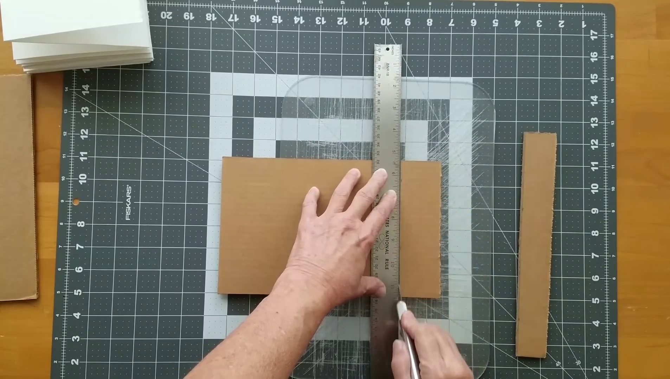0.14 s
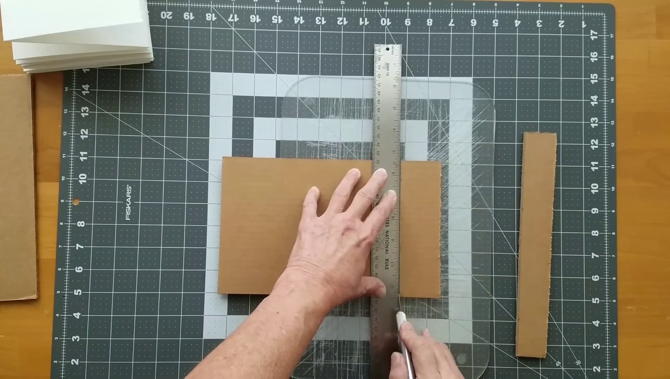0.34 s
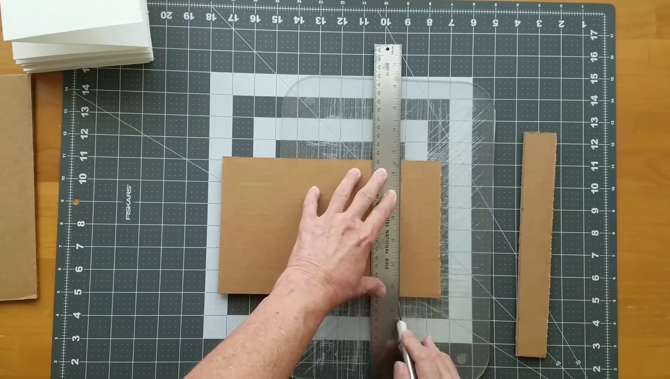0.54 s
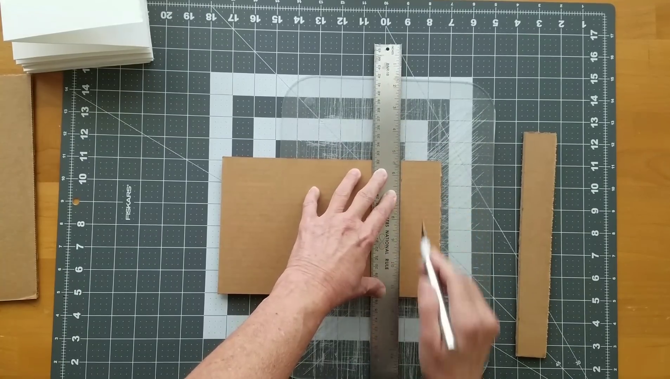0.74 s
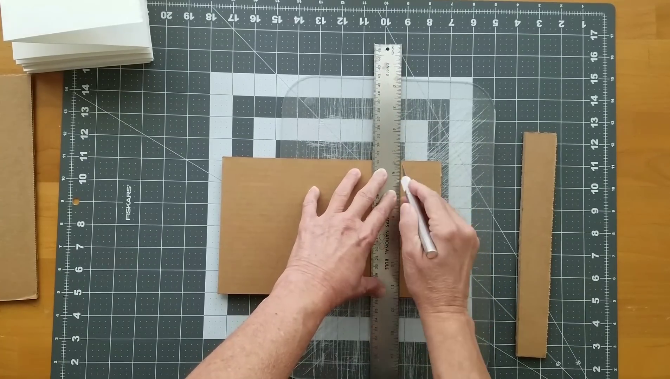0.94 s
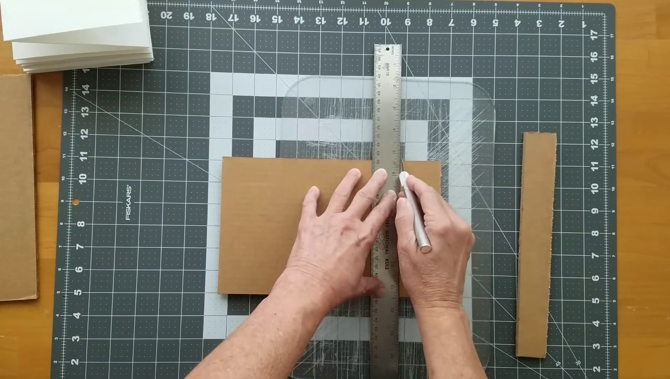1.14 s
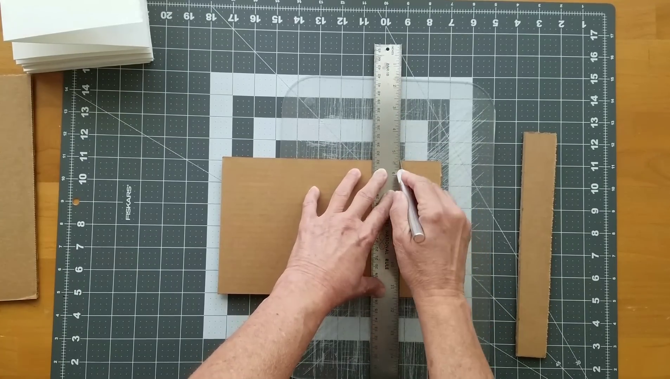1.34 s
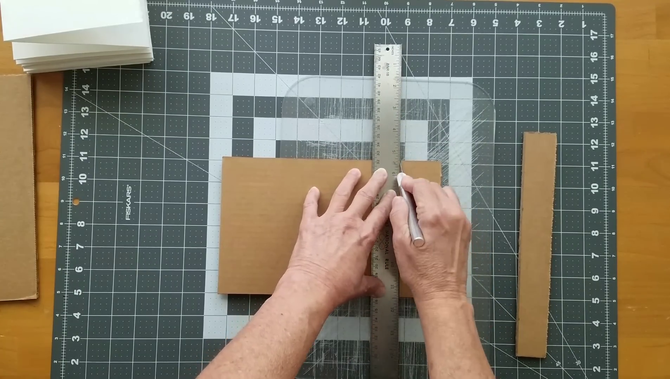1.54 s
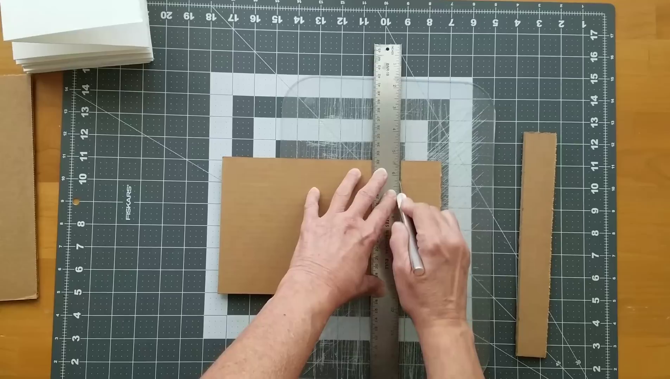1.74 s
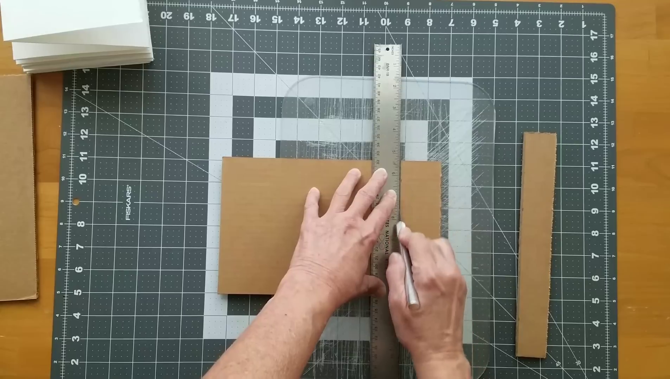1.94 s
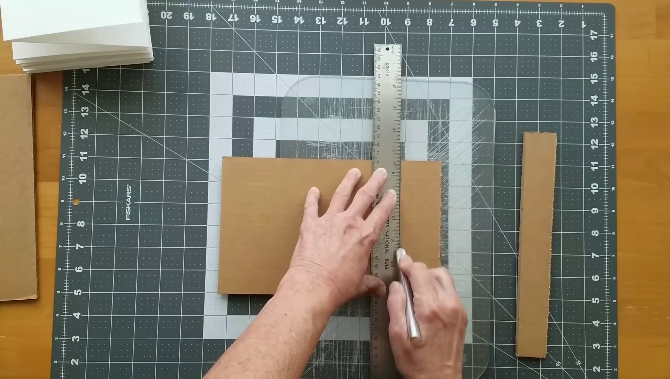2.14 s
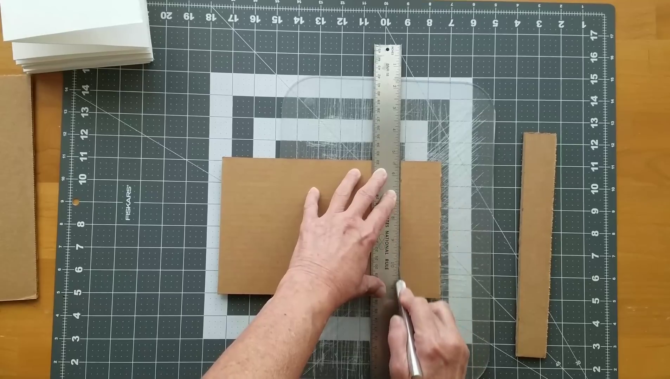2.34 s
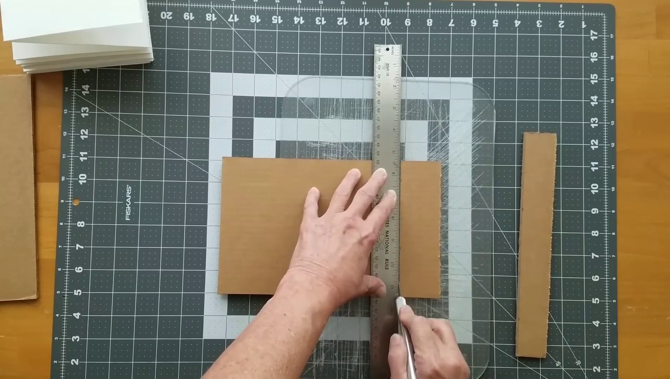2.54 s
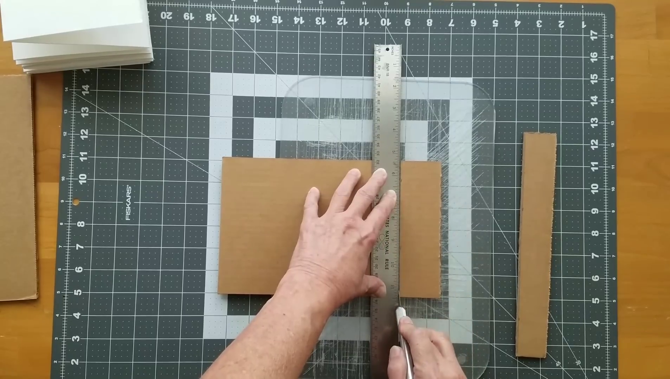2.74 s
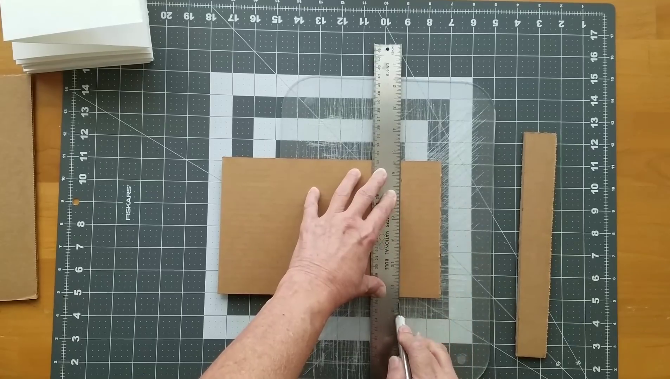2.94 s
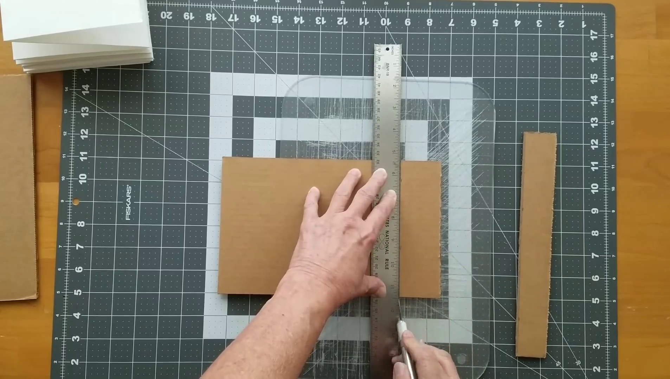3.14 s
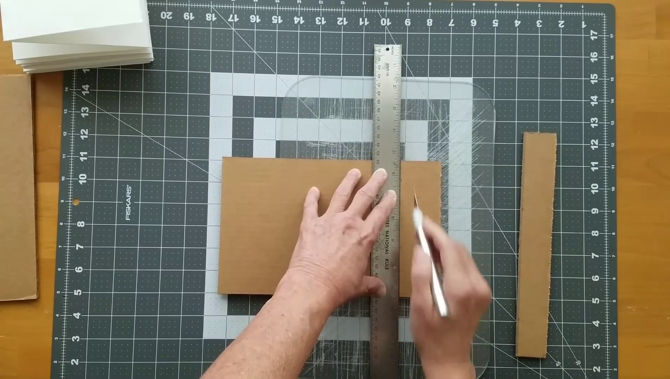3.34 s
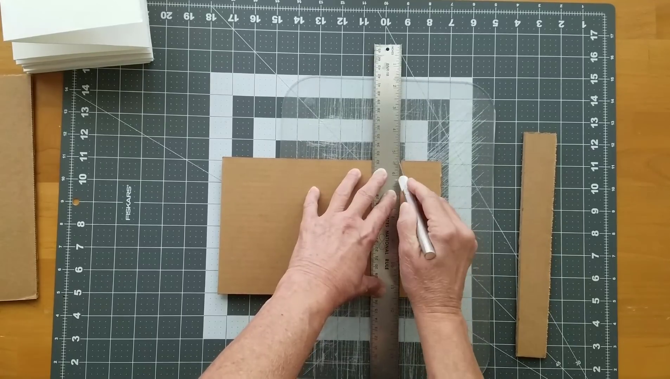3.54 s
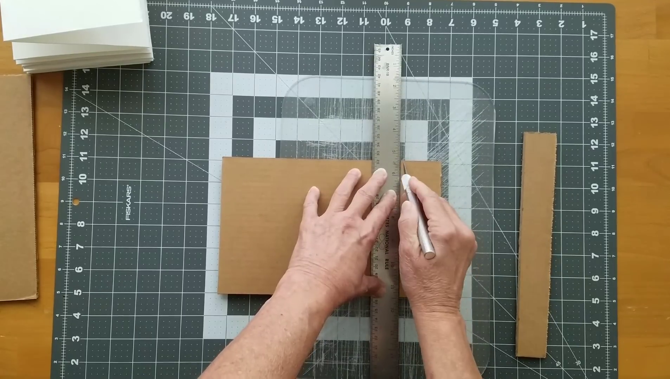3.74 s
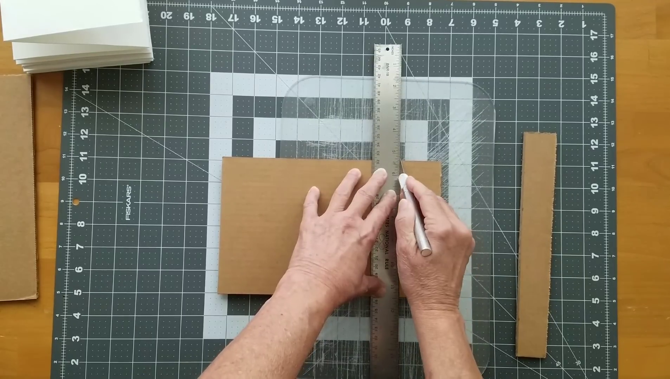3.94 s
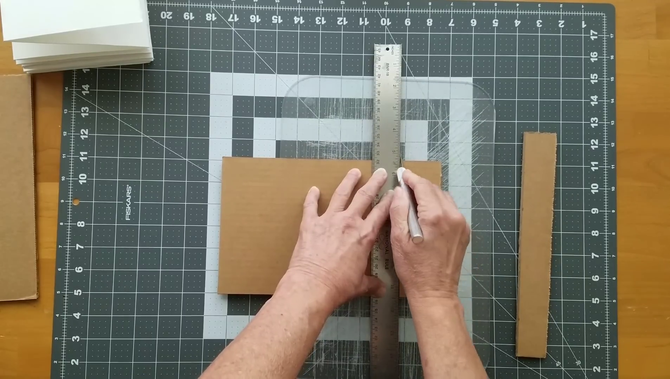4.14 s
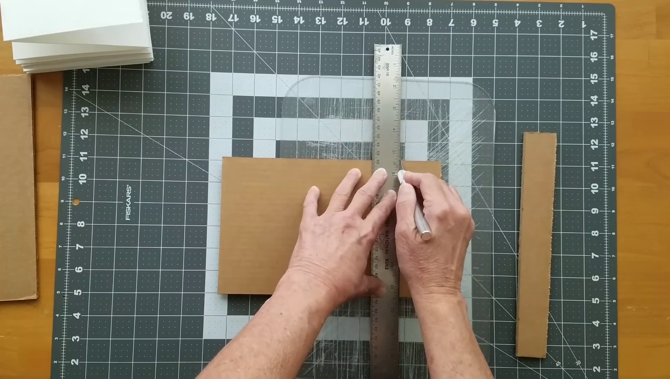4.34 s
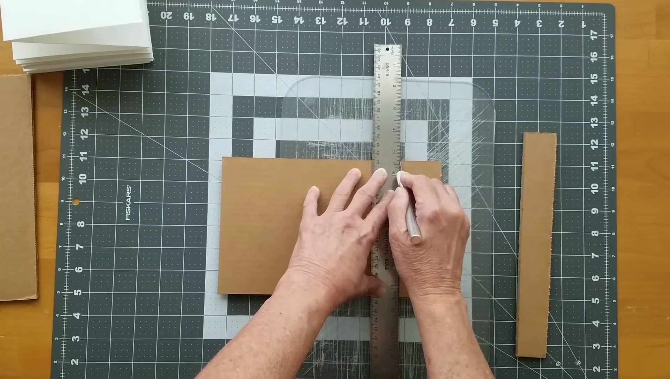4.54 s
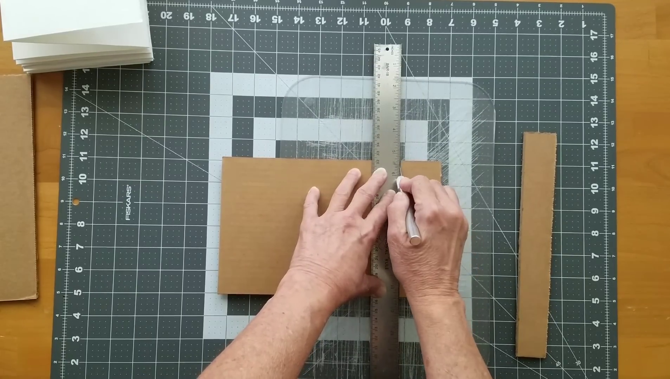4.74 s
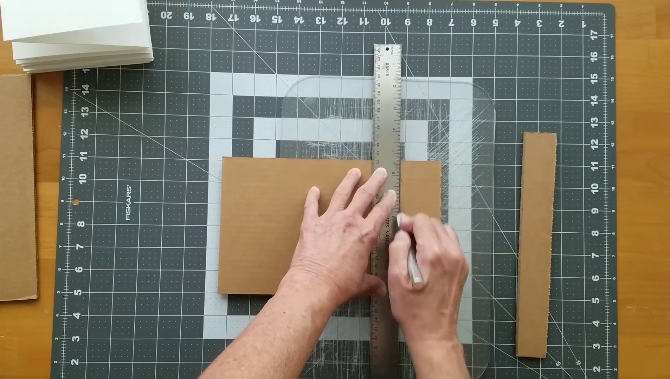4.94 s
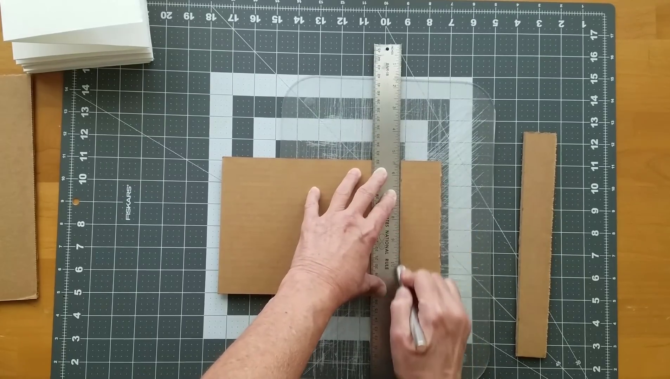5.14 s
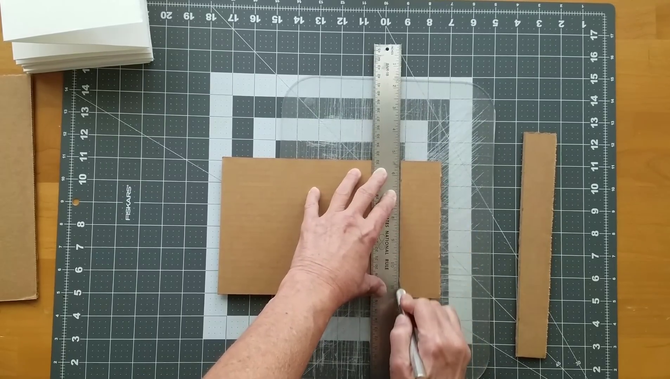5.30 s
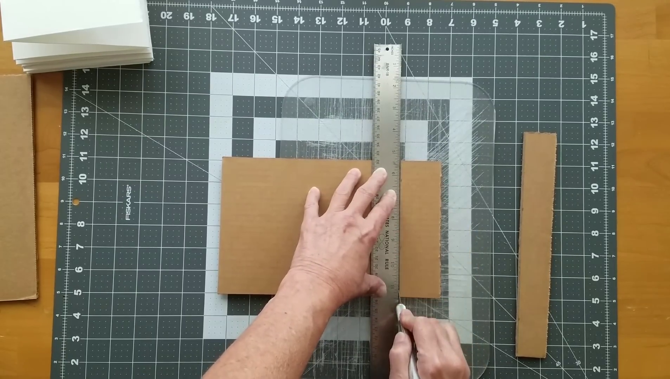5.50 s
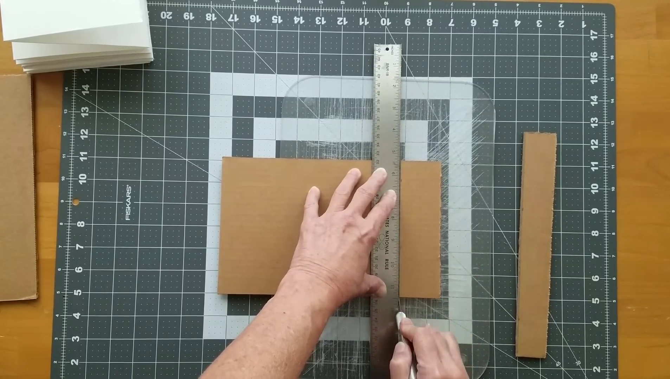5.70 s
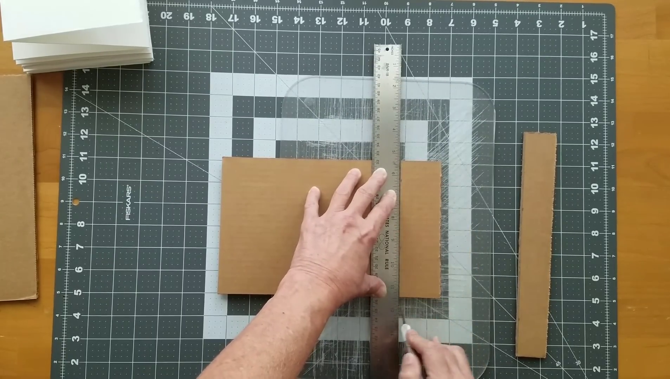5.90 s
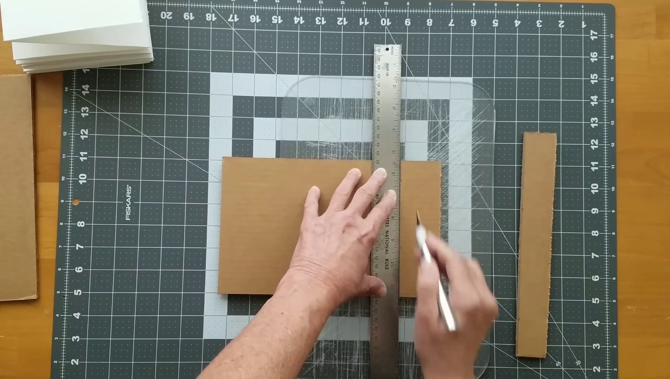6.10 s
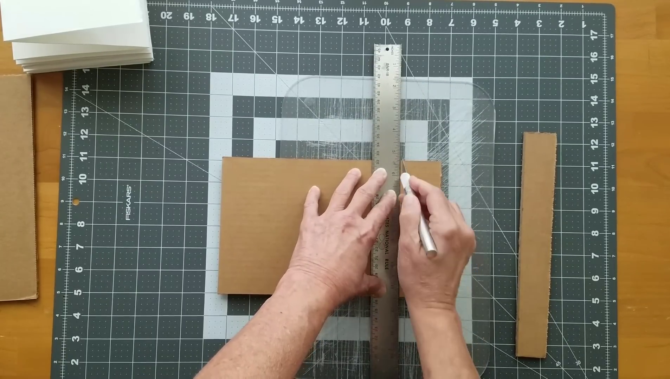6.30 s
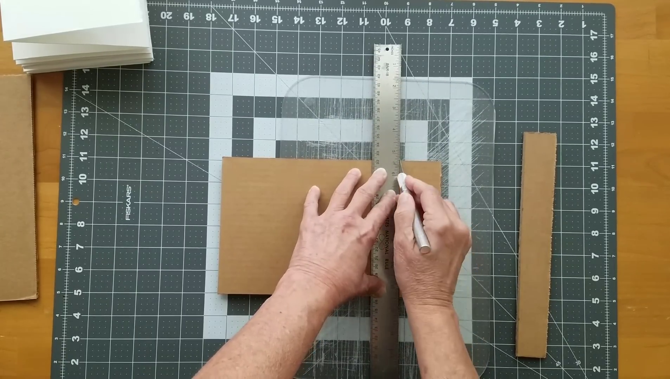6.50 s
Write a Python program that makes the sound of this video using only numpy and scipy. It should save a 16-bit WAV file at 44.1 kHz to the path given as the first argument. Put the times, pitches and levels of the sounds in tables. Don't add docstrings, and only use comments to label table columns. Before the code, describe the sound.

Close above a table in a small dry room, a craft knife finishes a cardboard cut and drops with a loud knock. After a quiet gap come two joined crunchy pulls, a duller double knock, small taps and ticks of steel on the ruler, then one last rasping cut and faint handling. Low ventilation rumble and slight microphone hiss stay underneath.

```python
import sys
import numpy as np
from scipy import signal
from scipy.fft import rfft, irfft, next_fast_len
from scipy.io import wavfile
from scipy.ndimage import uniform_filter1d

SR = 44100
rng = np.random.default_rng(int(sys.argv[2]) if len(sys.argv) > 2 else 0)


def dump(signal):
    limited = np.clip(np.atleast_2d(signal).T, -1, 1)
    pcm = np.round(limited * 32767).astype(np.int16)
    wavfile.write(sys.argv[1], SR, pcm)


def amplitude_ratio(level_db):
    exponent = np.asarray(level_db, float) / 20
    return 10 ** exponent


N = 293706

# hz, level_db (per Hz)
TEARING_COLOUR = [(90, -41.5), (150, -8.5), (280, -5), (800, -5), (1440, -19.5), (2300, -14), (3700, -22),
                  (6600, -30.5), (8100, -36), (11800, -24.5), (13200, -25.5), (15000, -25.5), (17000, -29)]
# start_s, thud_peak_db, rattle_db (board, above the thud), rattle_hz, thud_hz
BLADE_DROPS = [
    (0.491, -10, -8.5, 2300, 387),
    (3.0, -14, -27, 2940, 504),
    (3.169, -24, -9, 2950, 456),
]


def curve(table, hz):
    f, value = np.transpose(table)
    return np.interp(np.log(hz + 1), np.log(f), value)


def shape(x, gain):
    size = next_fast_len(x.shape[-1])
    hz = np.arange(size // 2 + 1) * SR / size
    return irfft(rfft(x, size) * gain(hz), size)[..., :x.shape[-1]]


def unit(x):
    return x / np.sqrt(np.mean(x ** 2))


def above(hz, edge_hz):
    return 1 / np.sqrt(1 + (edge_hz / (hz + 1)) ** 8)


def walk(rate_hz):
    hold = int(SR / rate_hz)
    steps = np.repeat(rng.standard_normal(N // hold + 1), hold)
    smooth = uniform_filter1d(uniform_filter1d(steps, hold), hold)
    return unit(smooth[:N])


def add(out, start_s, x):
    i = int(start_s * SR)
    out[..., i:i + x.shape[-1]] += x[..., :N - i]


def pair(x):
    # hz, likeness (0-1)
    likeness = [(60, 1), (200, 0.9), (380, 0.86), (700, 0.4), (1300, 0.1), (2400, 0.31), (4400, 0),
                (8000, 0), (12000, 0.5)]
    mid = shape(x[0], lambda f: np.sqrt((1 + np.clip(curve(likeness, f), 0, 1)) / 2))
    side = shape(x[1], lambda f: np.sqrt((1 - np.clip(curve(likeness, f), 0, 1)) / 2))
    return np.array([mid + side, mid - side])


def ring(modes, shorten):
    t = np.arange(SR // 2) / SR
    y = np.zeros(len(t))
    for hz, db, t60_s in modes:
        y += amplitude_ratio(db) * np.sin(2 * np.pi * hz * t) * amplitude_ratio(-60 * t / (t60_s * shorten))
    no_bass = signal.butter(4, 255, "high", fs=SR, output="sos")
    y = signal.sosfilt(no_bass, y)
    return y / np.abs(y).max()


def burst(t60_s, low_hz, high_hz):
    rise_s = 0.00076
    t = np.arange(SR // 8) / SR
    noise = shape(rng.standard_normal((2, len(t))),
                  lambda f: above(f, low_hz) * (1 - above(f, high_hz)) * amplitude_ratio(curve(TEARING_COLOUR, f)))
    return unit(pair(noise)) * amplitude_ratio(-60 * t / t60_s) * np.minimum(t / rise_s, 1) / 2


def knife():
    hiss_level, scrape_level, drone_level, groan_level = push()
    # start_s, peak_db, scrape_db (above the peak)
    flutes = [(0.054, -38, -15), (0.088, -30.5, -3.5), (0.204, -37, -34), (0.245, -37, -1.5),
              (1.748, -46, -8), (1.766, -40, -12), (1.871, -36.5, -10), (1.928, -44, -22),
              (1.981, -32, -15), (2.017, -37, -12), (2.098, -44, -3), (2.1593, -31, -2.5),
              (2.181, -34, -16), (2.207, -41.5, -6), (2.26, -27.5, -12), (2.305, -29, -8.5),
              (2.322, -26.5, -8.5), (2.396, -32, -7.5), (2.442, -35, -5), (2.4735, -33.5, -3.5),
              (2.51, -31.5, -7.5), (2.7145, -42.5, -0.5), (4.8642, -40, -26), (4.8934, -50, -22),
              (4.923, -58, -15), (5.045, -43, 2), (5.15, -47, 9), (5.2, -42, 6), (5.258, -58, 6),
              (5.3954, -52.5, 7)]
    # pitch_hz, width_hz, level_db
    board = [(144, 24.5, 9), (281, 40, 0.5), (872, 41, 1.5), (1195, 21, -2.5), (1920, 16, -2),
             (2300, 230, -18.5), (2740, 50, -6.5)]

    attack_s, release_s = 0.0032, 0.0079
    bite = np.zeros((2, N))
    t = np.arange(SR // 5) / SR
    swell = (1 - np.exp(-t / attack_s)) * np.exp(-t / release_s)
    for start_s, db, scrape_db in flutes:
        add(bite, start_s, amplitude_ratio(db + np.array([[0], [scrape_db]])) * swell)
    hiss_bite, scrape_bite = bite

    grains = rng.standard_normal((2, N)) * (rng.random(N) < .3)
    fibres = unit(grains * amplitude_ratio(0.76 * rng.exponential(size=N)))
    fibres = fibres * amplitude_ratio(1.9 * walk(45) + 1.65 * walk(300))
    snaps = rng.standard_normal((2, N)) * (rng.random(N) < .006)
    snaps = snaps * amplitude_ratio(0.93 * rng.exponential(size=N))
    scraped = unit(fibres) + amplitude_ratio(-2) * unit(snaps) * amplitude_ratio(3.1 * walk(90))

    def board_tear(f):
        tones = sum(amplitude_ratio(db + 14) / np.sqrt(1 + (2 * (f - hz) / width) ** 2) for hz, width, db in board)
        return amplitude_ratio(curve(TEARING_COLOUR, f)) * (1 + tones)

    hiss = unit(shape(fibres, lambda f: amplitude_ratio(curve(TEARING_COLOUR, f)) * above(f, 5480)))
    scrape = unit(shape(scraped, lambda f: board_tear(f) * above(f, 1563) * (1 - above(f, 7420))))
    drone = unit(shape(fibres, lambda f: board_tear(f) * above(f, 104) * (1 - above(f, 1090))))
    groan = shape(drone, lambda f: 1 - above(f, 474))

    out = (amplitude_ratio(1) * hiss_level + amplitude_ratio(-9) * hiss_bite) * hiss
    out += (amplitude_ratio(-0.5) * scrape_level + amplitude_ratio(-1.5) * scrape_bite) * scrape
    out += (amplitude_ratio(-5) * drone_level + amplitude_ratio(-15) * scrape_bite) * (drone - groan)
    out += (amplitude_ratio(-8) * groan_level + amplitude_ratio(-8) * scrape_bite) * groan
    return pair(out)


def push():
    # start_s, push_db, depth_db (in the board), lean_db (on the ruler)
    cuts = [
        [(0.0, -41.5, 3.5, 2), (0.07, -50, -1.5, 2.5), (0.17, -48.5, 1, 3), (0.27, -49.5, 0, -4),
         (0.33, -76, 5, 2)],
        [(1.62, -72, 5.5, 1.5), (1.725, -63.5, 4, -8), (1.775, -45.5, 1.5, -2), (1.83, -55.5, 1.5, -0.5),
         (1.92, -48, 1, -0.5), (1.96, -60, 2, 2.5), (2.03, -50, 2, 3.5), (2.085, -57.5, 3.5, 1)],
        [(2.115, -52.5, 2, 2.5), (2.15, -56, 2.5, -1), (2.18, -50.5, 3, 1.5), (2.25, -58, 7, 2.5),
         (2.33, -56, 1, 1), (2.37, -58.5, 4, -2), (2.45, -54, -4.5, 6), (2.53, -50, 2, -16), (2.6, -76, 0, 13)],
        [(4.66, -77, 6.5, -4), (4.85, -58.5, 4.5, -1), (4.868, -47, 3, -16), (4.9, -50, 5.5, -2),
         (5.2, -47.5, 6, 3), (5.304, -55, 0.5, 7.5), (5.414, -53.5, 4.5, 5), (5.47, -75, -3, 13)],
    ]
    # peak_s, peak_db, rise_s, fall_s, depth_db
    slides = [(0.424, -50, 0.054, 0.071, -0.5), (0.464, -55, 0.044, 0.022, -3.5),
              (1.063, -65.5, .02, 0.076, 1), (1.27, -64.5, 0.057, 0.053, -8),
              (2.646, -51, 0.034, 0.027, 3.5), (2.714, -48.5, 0.051, 0.032, 1), (2.97, -56.5, 0.14, .05, 2),
              (3.008, -47.5, .05, 0.082, 1.5), (3.16, -54.5, 0.0095, 0.11, -2),
              (3.23, -57, .06, 0.036, -1.5), (4.206, -64, .03, 0.066, -3), (4.25, -65, .04, 0.016, 6),
              (4.39, -71.5, 0.027, 0.099, 8), (5.491, -71, .03, 0.036, 12), (5.53, -57.5, .015, 0.18, 6),
              (5.584, -56.5, 0.13, 0.13, 5.5), (5.77, -59, 0.03, 0.1, 5), (5.848, -61, 0.064, 0.05, 12.5),
              (6.555, -74, .02, 0.045, -2), (6.636, -64, 0.029, .08, -7)]
    slide_range_db = 25
    t = np.arange(0, N / SR, .001)
    levels = np.zeros((4, len(t)))

    def layers(db, depth_db, lean_db=0):
        scrape_db = db + lean_db - 4.5 + depth_db
        groan_db = db - 1.5 + 1.51 * depth_db
        return amplitude_ratio([db, scrape_db, db + depth_db, groan_db])

    for cut in cuts:
        s, *controls = np.transpose(cut)
        fade = np.interp(t, [s[0] - .03, s[0], s[-1], s[-1] + .03], [0, 1, 1, 0])
        levels += fade * layers(*(np.interp(t, s, c) for c in controls))
    for peak_s, db, rise_s, fall_s, depth_db in slides:
        away = np.maximum((peak_s - t) / rise_s, (t - peak_s) / fall_s)
        levels += layers(db - slide_range_db * np.minimum(away, 4), depth_db)
    return np.array([np.interp(np.arange(N) / SR, t, row) for row in levels])


def snags():
    # start_s, peak_db
    catches = [
        (1.7473, -40.5),
        (2.2624, -44),
        (2.5191, -34),
        (2.7157, -39.5),
        (4.8655, -38.5),
        (4.8918, -36),
        (5.7848, -41.5),
    ]
    out = np.zeros((2, N))
    for start_s, db in catches:
        add(out, start_s, amplitude_ratio(db) * burst(0.038, 1420, 9000))
    return out


def knocks():
    # start_s, peak_db, pitch_hz
    taps = [
        (3.718, -44.5, 615),
        (4.247, -43, 610),
        (4.387, -48.5, 378),
        (5.85, -39, 654),
    ]
    out = np.zeros((2, N))
    for start_s, db, rattle_db, rattle_hz, hz in BLADE_DROPS:
        thud = ring(near(hz, db_per_octave=14), shorten=.17)
        add(out, start_s + 0.0016, -amplitude_ratio(db - 5.5) * thud)
        add(out, start_s - .0002, amplitude_ratio(1.5 * db - 8.5) * burst(0.051, 3710, 17700))
        rattle = burst(0.037, 0.47 * rattle_hz, 1.53 * rattle_hz)
        add(out, start_s + 0.0008, amplitude_ratio(db + rattle_db + 2.5) * rattle)
    soft_start = np.minimum(np.arange(SR // 2) / SR / 0.0024, 1)
    for start_s, db, hz in taps:
        add(out, start_s, amplitude_ratio(db - 7.5) * ring(near(hz, db_per_octave=19), shorten=0.3) * soft_start)
    return out


def ticks():
    # start_s, peak_db, then above the click edge_db (bright) and wood_db, wood_hz
    touches = [
        (3.6592, -55, -9, -7.5, 1790),
        (3.7954, -46, 1.5, -10, 890),
        (4.2041, -57.5, -3, -14, 528),
        (5.7284, -47.5, -2.5, -17, 886),
        (5.9998, -52, -2.5, -12, 880),
    ]
    # pitch_hz, level_db, t60_s
    ruler = [(2230, -22, 0.16), (2606, -65, 0.23), (3530, -12, 0.11), (6480, 6, 0.11), (7600, -3, 0.13),
             (12600, -32, 0.099), (12750, -39, 0.22), (13490, 8, 0.13)]
    out = np.zeros((2, N))
    for start_s, db, edge_db, wood_db, hz in touches:
        click = amplitude_ratio(db + 4.5) * burst(0.04, 990, 7900)
        edge = amplitude_ratio(db + edge_db + 1) * burst(0.051, 4800, 25000)
        add(out, start_s, click + edge)
        add(out, start_s, amplitude_ratio(db + edge_db - 1.5) * ring(ruler, shorten=0.35))
        add(out, start_s, amplitude_ratio(db + wood_db + 10) * ring(near(hz, db_per_octave=27), shorten=0.13))
    return out


def near(hz, db_per_octave):
    # pitch_hz, level_db, t60_s
    table_tones = [(135, -26, 0.174), (236, -44.5, 0.16), (277.5, -0.5, 0.4), (400, -10, 0.29),
                   (444, -7.5, 0.51), (533, -3, 0.36), (618, 6.5, 0.11), (663, -15.5, 0.0302),
                   (886, -7, 0.1), (1108, 3.5, 0.26), (1790, 5, 0.2), (2040, -10.5, 0.12),
                   (2546, 5.5, 0.277)]
    return [(f, db - db_per_octave * abs(np.log2(f / hz)), t60_s) for f, db, t60_s in table_tones]


def room(x):
    # delay_s, level_db, sign (1 or -1)
    echoes = [
        (.0105, -.5, 1),
        (.0163, 3, -1),
        (.0252, -4.5, 1),
    ]
    low_t60_s, high_t60_s = 0.27, .14
    t = np.arange(int(.4 * SR)) / SR
    noise = rng.standard_normal((2, len(t))) * np.minimum(t / 0.0064, 1)
    low = shape(noise * amplitude_ratio(-60 * t / low_t60_s), lambda f: 1 - above(f, 1540))
    high = shape(noise * amplitude_ratio(-60 * t / high_t60_s), lambda f: above(f, 1500))
    tail = pair(amplitude_ratio(-25.5) * low + amplitude_ratio(-31) * high)
    early = np.zeros((2, len(t)))
    for delay_s, db, sign in echoes:
        early[:, int(delay_s * SR)] = sign * amplitude_ratio(db)
    response = tail + shape(early, lambda f: 1 / np.sqrt(1 + (f / 1100) ** 4))
    response[:, 0] += 1
    return signal.fftconvolve(x, response, axes=1)[:, :N]


def air():
    # hz, level_db (per Hz)
    air_colour = [(12, -54), (20, -22.5), (38, -13), (113, -1.5), (138, -2.5), (169, -15), (229, -12.5),
                  (306, -24), (347, -24), (841, -29.5), (1500, -33.5), (1950, -59), (3300, -120)]
    # hz, level_db (per Hz)
    hiss_colour = [(760, -29.5), (1300, -6), (1570, -7), (1690, -3.5), (2410, -5), (6250, -19.5),
                   (10200, -22.5), (11700, -16.5), (14700, -13), (15800, -17.5)]
    noise = unit(pair(shape(rng.standard_normal((2, N)), lambda f: amplitude_ratio(curve(air_colour, f)))))
    hum = shape(noise, lambda f: above(f, 190))
    rumble = noise - hum
    hiss = unit(pair(shape(rng.standard_normal((2, N)), lambda f: amplitude_ratio(curve(hiss_colour, f)))))
    return hum * amplitude_ratio(-56 + .5 * walk(4.5)) + hiss * amplitude_ratio(-71.5) + rumble * rumble_level()


def rumble_level():
    # time_s, level_db
    ventilation = [(0, -47), (.7, -58), (.85, -54), (1.6, -56.5), (4.6, -57.5), (6.66, -59.5)]
    shake_lag_s, thump_s = 0.16, 0.0714
    t = np.arange(N) / SR
    groan_level = push()[3]
    shake = amplitude_ratio(-6.5) * uniform_filter1d(groan_level, int(shake_lag_s * SR))
    thumps = np.zeros(N)
    for start_s, db, *_ in BLADE_DROPS:
        thumps += amplitude_ratio(db - 34.5) * (t > start_s) * np.exp(-np.abs(t - start_s) / thump_s)
    fan = amplitude_ratio(np.interp(t, *np.transpose(ventilation)))
    return np.sqrt(fan ** 2 + shake ** 2 + thumps ** 2)


def scene():
    return room(amplitude_ratio(-1.5) * knife() + knocks() + ticks() + snags()) + air()


def band_limit(x):
    return signal.sosfilt(signal.butter(12, 16820, fs=SR, output="sos"), x)


def record(dry):
    bass = shape(dry[0], lambda f: 1 - above(f, 2500))
    late_bass = np.roll(bass, 2)
    ports = np.array([dry[0] - bass + late_bass, dry[1]])
    top_cut = shape(ports, lambda f: np.interp(f, [15840, 15900, 16800, 16850], [1, .02, .02, 0]))
    return band_limit(top_cut - .0005)


dry = scene()
out = record(dry)
dump(out)
```